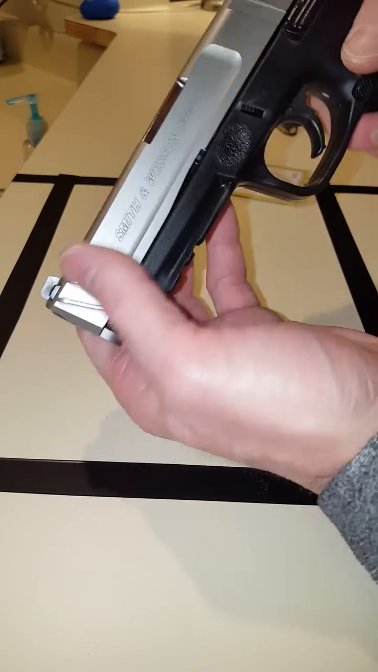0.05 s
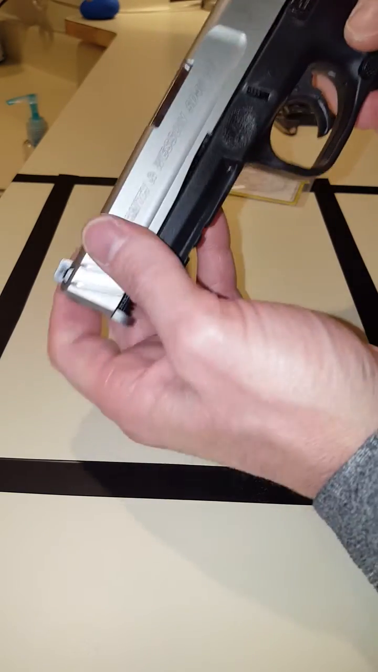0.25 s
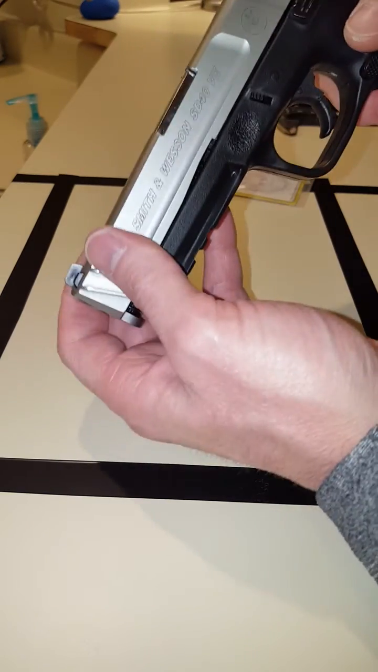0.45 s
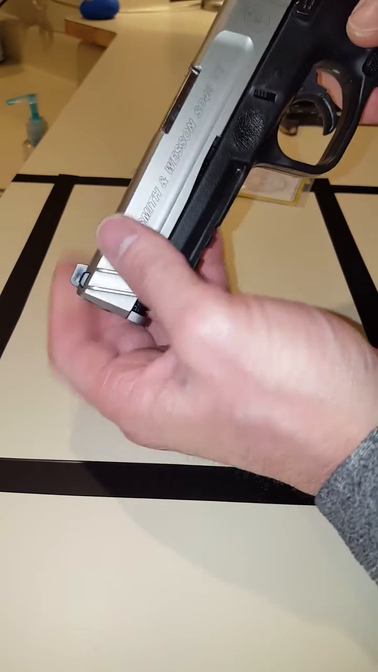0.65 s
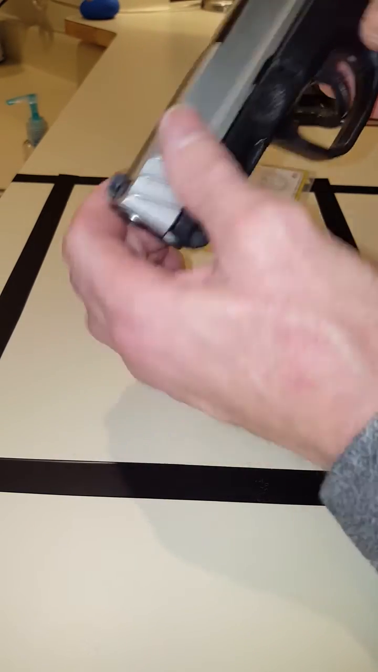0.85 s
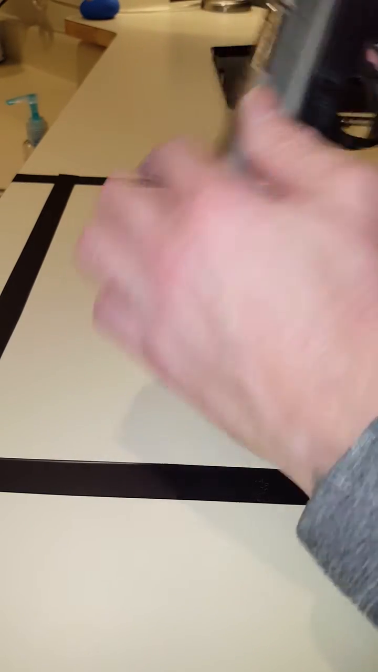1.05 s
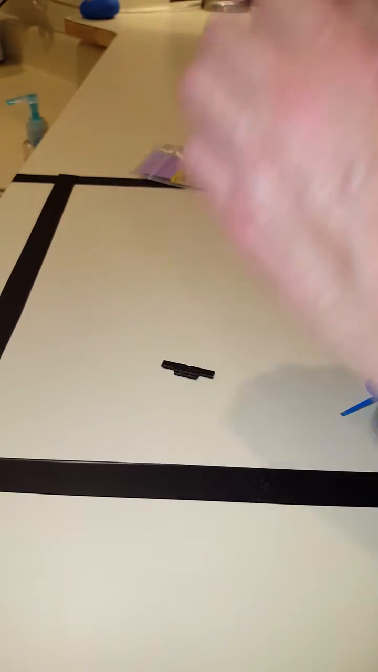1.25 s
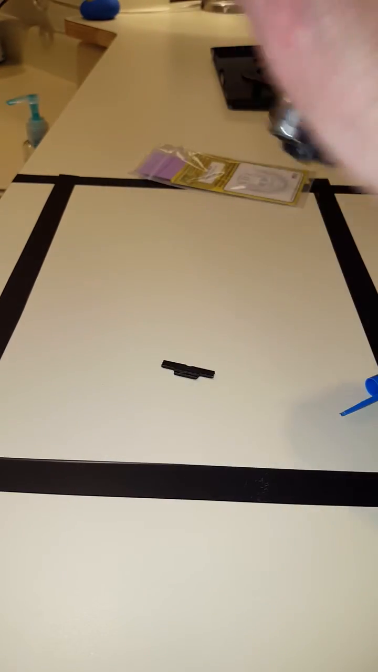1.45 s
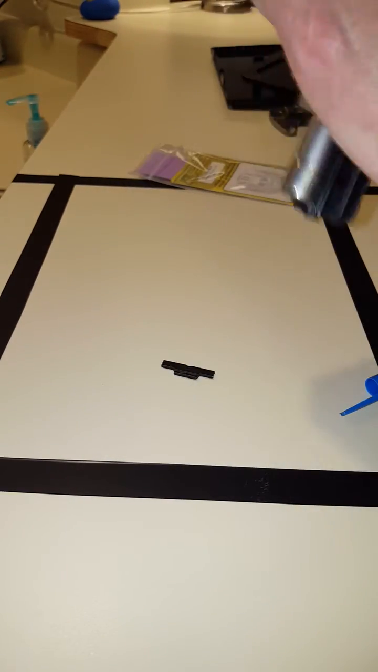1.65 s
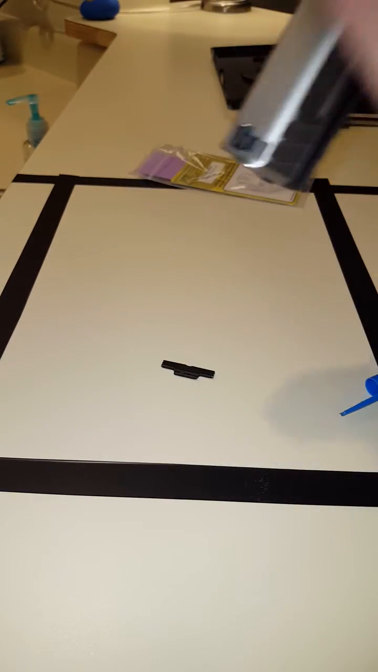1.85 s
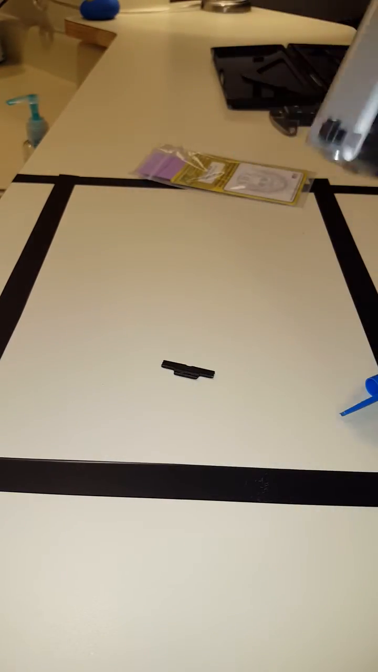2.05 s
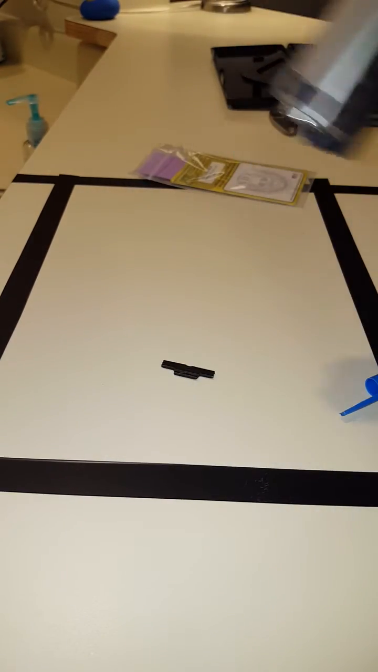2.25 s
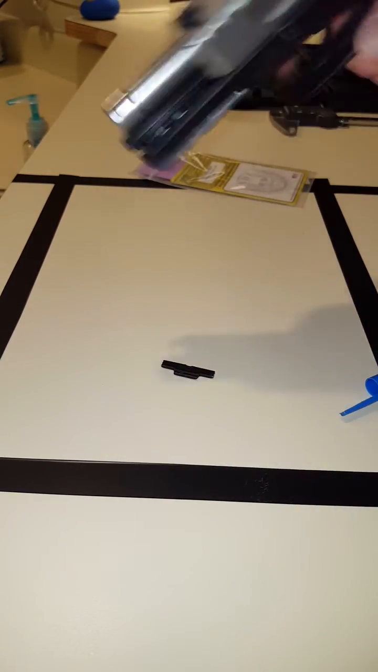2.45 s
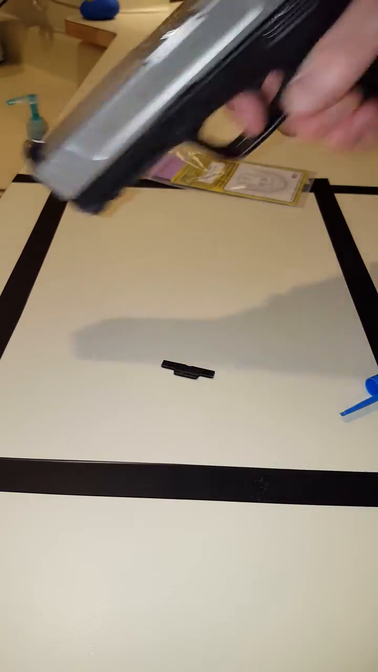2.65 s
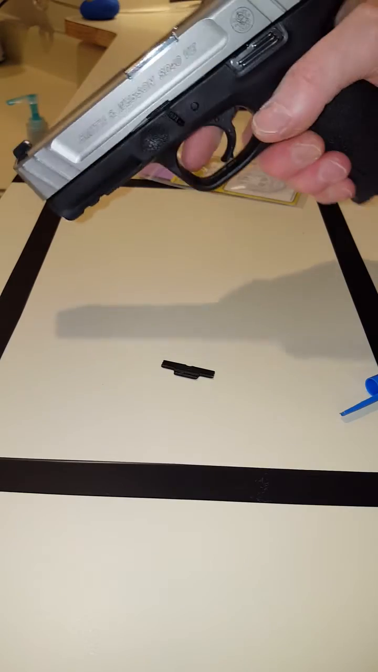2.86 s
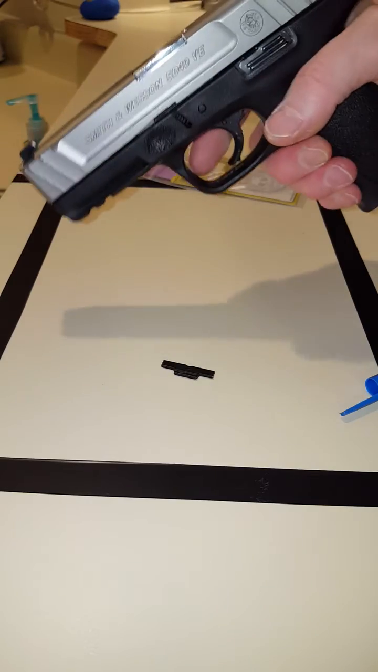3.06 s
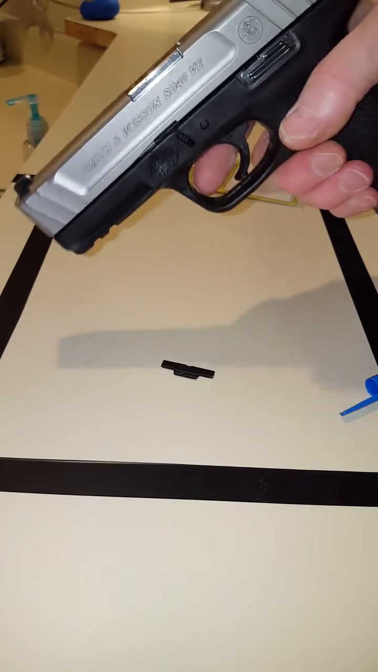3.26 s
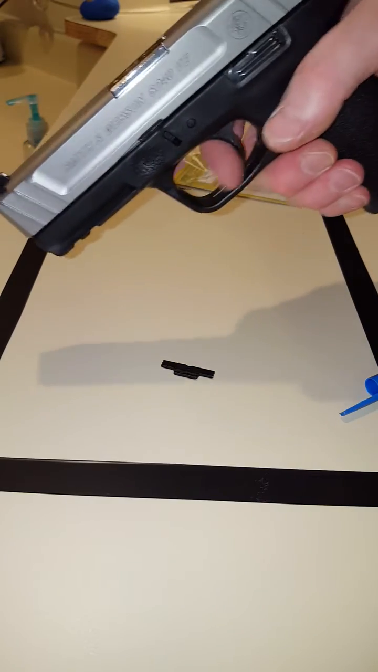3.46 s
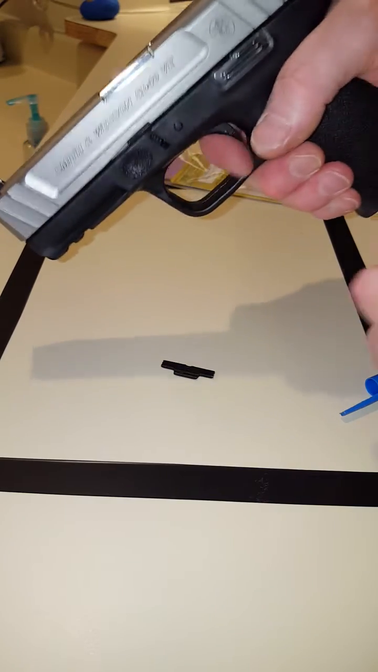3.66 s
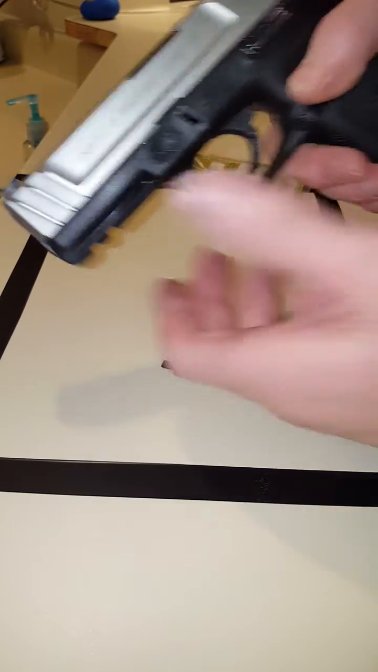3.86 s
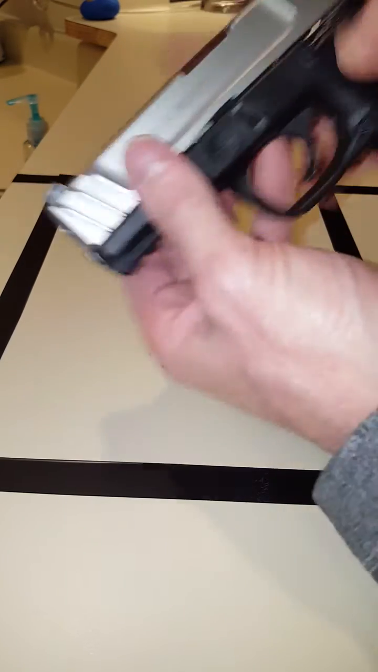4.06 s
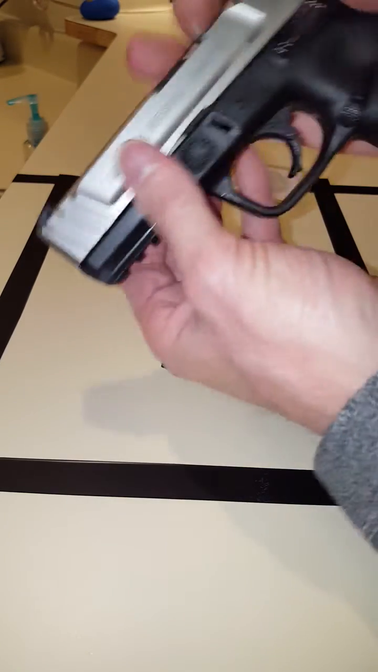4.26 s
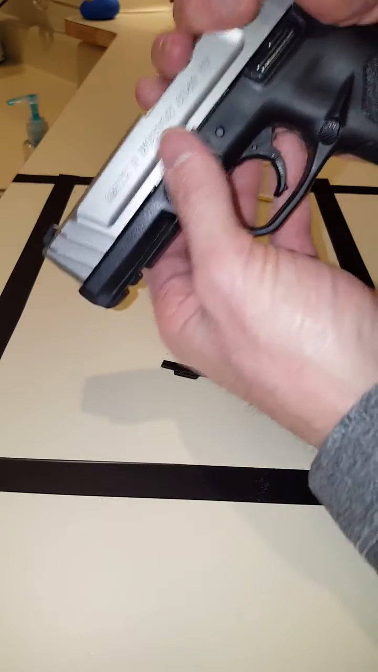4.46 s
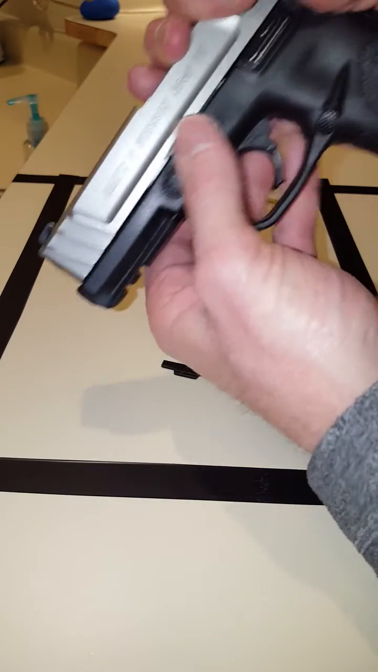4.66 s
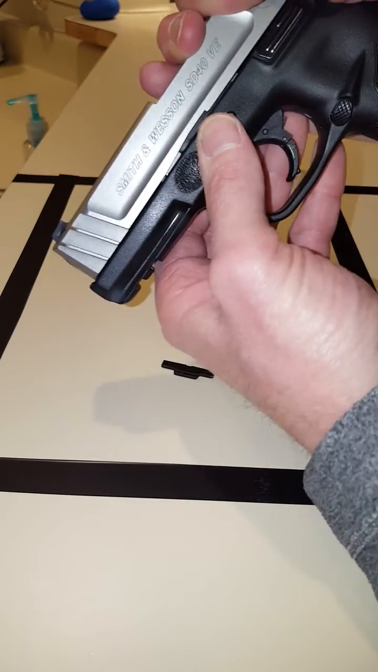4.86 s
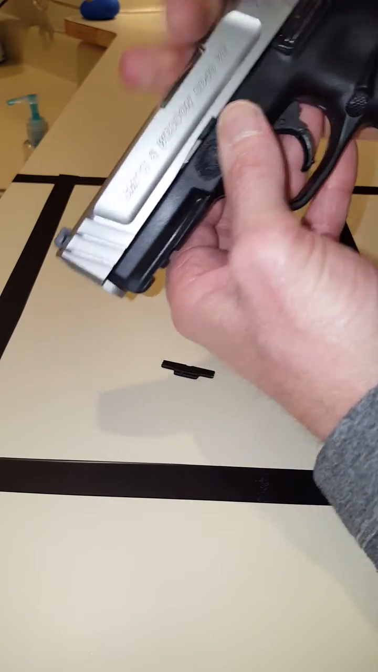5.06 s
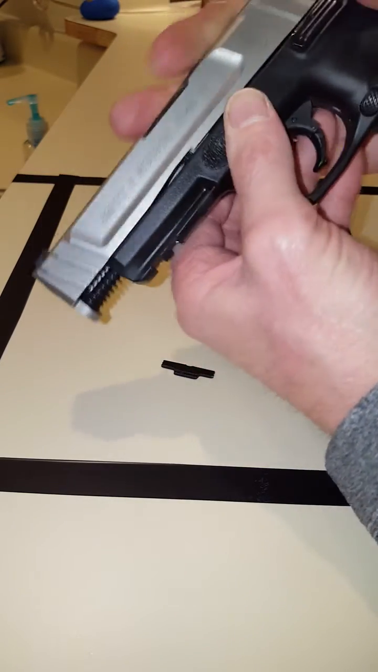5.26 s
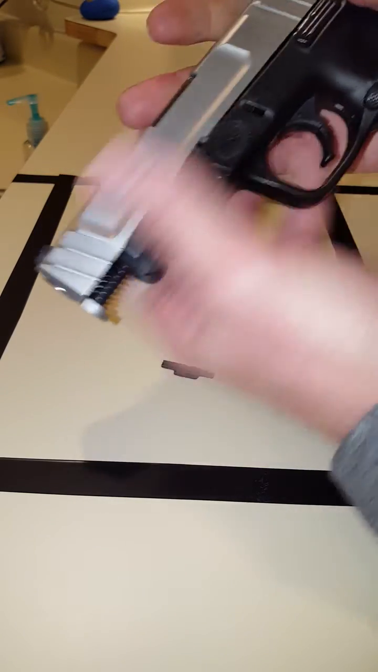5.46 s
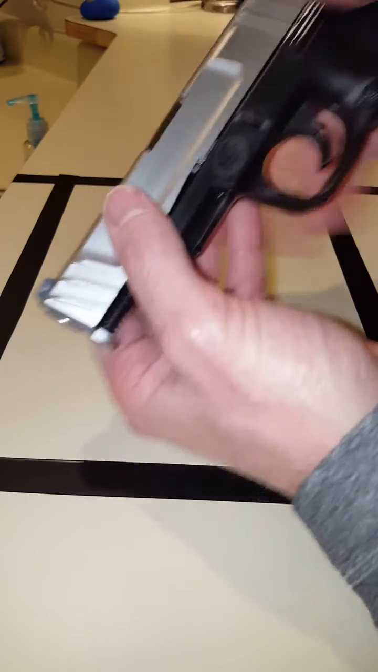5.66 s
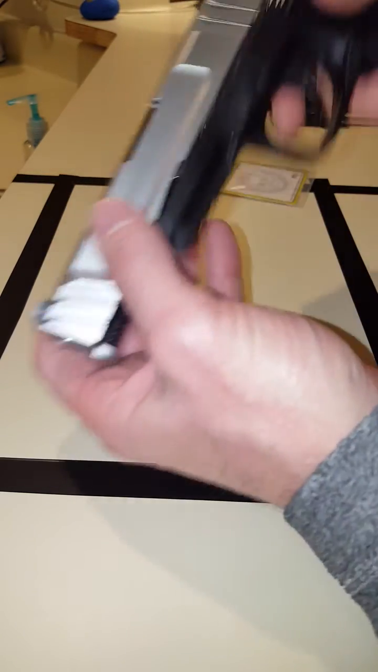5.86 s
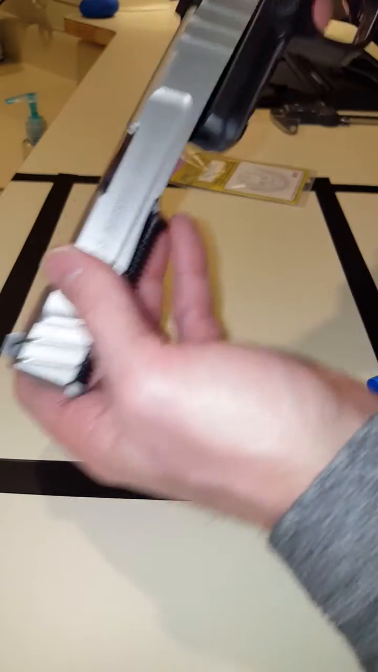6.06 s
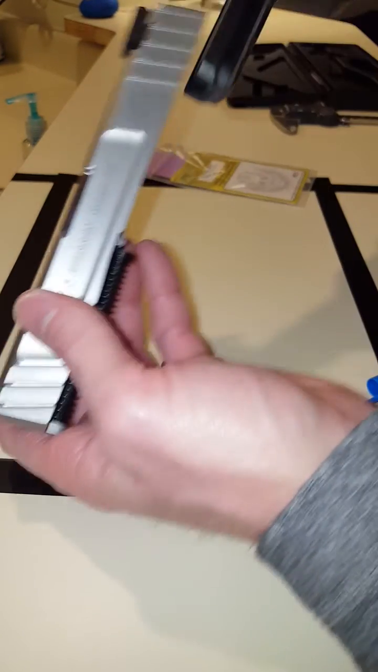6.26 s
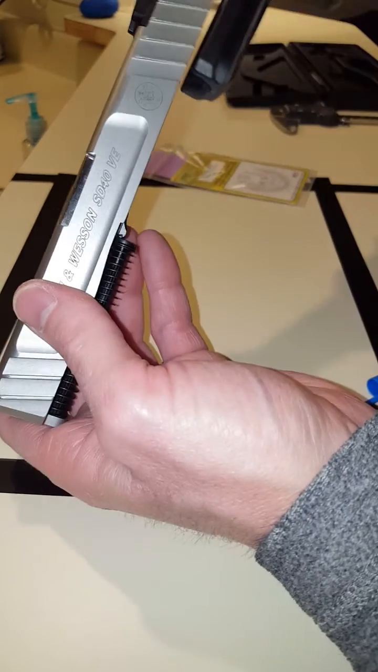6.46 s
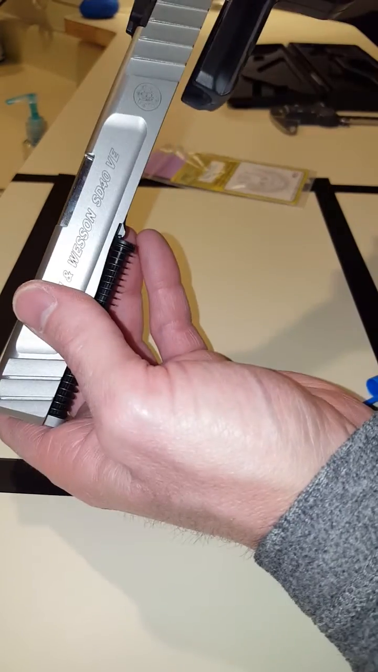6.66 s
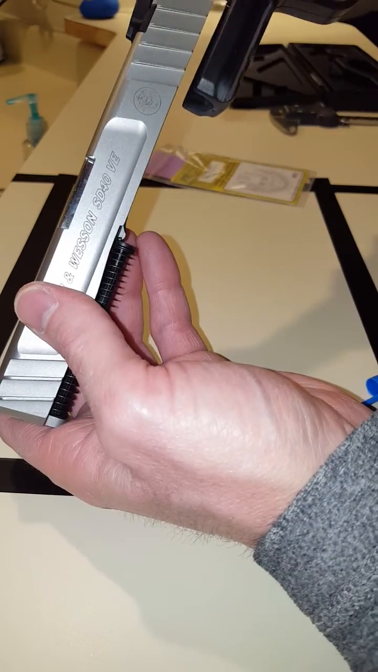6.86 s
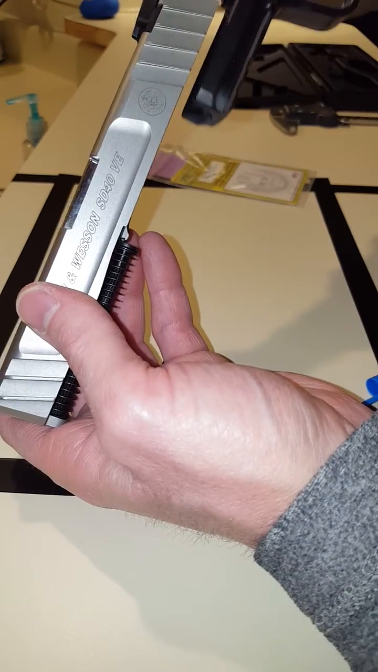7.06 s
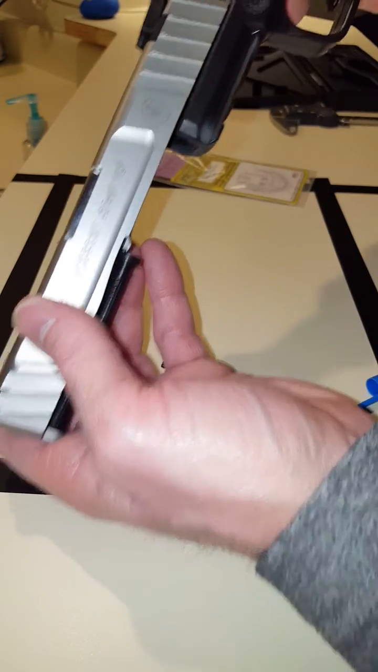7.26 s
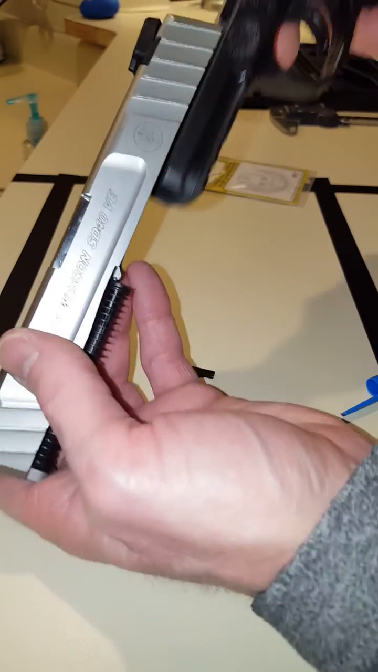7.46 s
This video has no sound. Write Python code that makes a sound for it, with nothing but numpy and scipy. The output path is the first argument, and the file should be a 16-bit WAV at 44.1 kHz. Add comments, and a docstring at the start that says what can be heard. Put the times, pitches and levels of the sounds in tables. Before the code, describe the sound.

Sharp steel clacks of a pistol slide being racked in a hard room, followed by lighter irregular clicks thinning out above fan-like rumble.

```python
"""An unloaded pistol is worked by hand over a table in a hard room, heard by two microphones set apart.
Clicks (noise bursts) and scrapes (swarms of catches) begin lightly; then, from about 1.4 to 3.6 s, slams
ring the steel (decaying modes), hard blows overload the microphones (short low noise bursts), echoes
follow (random taps), and the gain sinks. Lighter handling follows, sparser towards the end. Throughout
lie a fan-like rumble (random spectra) and steady hum lines (sines)."""
import sys
import numpy as np
from scipy import signal
from scipy.io import wavfile
from scipy.ndimage import uniform_filter1d, minimum_filter1d

SR = 44100
rng = np.random.default_rng(int(sys.argv[2]) if len(sys.argv) > 2 else 0)


def generate_wav(sig):
    """Save sig (samples, or channels by samples) to the path in sys.argv[1] as 16-bit PCM at SR."""
    pcm = np.round(np.clip(np.atleast_2d(sig).T, -1, 1) * 32767).astype(np.int16)
    wavfile.write(sys.argv[1], SR, pcm)


def rack_gain(trim_db):
    """Turn a fader trim in dB into the linear factor to multiply a signal by."""
    fader = np.asarray(trim_db, float)
    return 10 ** (fader / 20)


N = 332073

# Blows of the parts; levels are relative, the room share is capped when used:
# (time [s], level [dB], treble over body [dB], share sent to the room [dB])
CLICKS = [(0.8023, -22, -8, -13), (.829, -20, -12, -7.5), (0.833, -13, 0, 3), (0.837, -18.5, 3, -4),
          (0.847, -20, 6, -9), (0.851, -25, 4, -6), (1.0572, -34.5, -7, 0), (1.224, -38.5, -41, 2.5),
          (1.256, -31.5, -20, -9), (1.2916, -33, -3.5, -24), (1.362, -39.5, 2, -4), (1.3896, -37, -11, 7),
          (1.3974, -36, 4, -8), (1.407, -7, 11, -1), (1.445, -2, 2, -1), (1.5686, -21.5, -16, 2.5),
          (1.5784, -19, 0, -15), (1.67, -38, 20, -10.5), (1.682, -34, -20, -4), (1.6888, -32, -17, -6),
          (1.7073, -22, -26, -16), (1.7317, -12, 4, 4), (1.7368, -0.5, 3.5, -7), (1.742, 0, 7.5, 6),
          (1.9781, -30, -8, -10), (2.22, -22.5, -4, -0.5), (2.2476, -24.5, -4, -7), (2.2665, -31, 4, -4),
          (2.271, -17, -4, 1), (2.324, -22, -3, -11), (2.344, -17.5, 2, -9), (2.38, -8, -2.5, 2),
          (2.3896, -0.5, -1.5, 0.5), (2.439, -10, 8, -11), (2.5269, -9.5, -10.5, -4), (2.5546, 0, 1, -9),
          (2.5613, 2.5, 7, 8), (2.78, -30.5, 20.5, -10), (3.451, -39, -3, -9.5), (3.4718, -28, -0.5, -2),
          (3.4878, -28, -11, -5), (3.5085, -36, 3, -13), (3.537, -31.5, 4, -8), (3.5493, -13.5, -1, 2.5),
          (3.554, -5, 7, 6), (3.7415, -18.5, -2.5, 3), (4.0151, -36, -14.5, -3), (4.038, -35, -5, -11),
          (4.077, -32, -10, 0), (4.187, -22, -8.5, -10), (4.268, -36.5, -9, 1), (4.292, -32.5, -27, 1),
          (4.342, -34.5, -4, 1.5), (4.369, -32.5, -10, -13), (4.388, -32.5, -21, -4), (4.429, -39, -33, -4),
          (4.4444, -31, -3, 1), (4.4899, -18, -7, -5.5), (4.505, -22.5, -8, -15.5), (4.9665, -37.5, -25, 0),
          (5.0004, -28, -2.5, 1), (5.007, -24.5, -21, -3.5), (5.012, -23, -10, -9), (5.017, -19, -10, -10),
          (5.117, -38.5, -27, 9), (5.1448, -32.5, 1, 3), (5.181, -30, -20, -7), (5.2935, -34.5, -30, -2),
          (5.332, -12.5, 1, -1.5), (5.4778, -36, -7, 1), (5.554, -35, -13, -19.5), (5.592, -36, -31, -13),
          (5.6076, -28, -18, -3.5), (5.739, -37, -22, 0), (5.777, -20.5, -19, -7), (5.8143, -22, -21, -4),
          (5.8338, -26.5, -12, 1), (5.8718, -23.5, -17, 9.5), (6.173, -33, -23, -2), (6.19, -31, -23, 2),
          (6.2115, -31, -15.5, -3), (7.189, -36, -21.5, -2), (7.2648, -40, -27, -10),
          (7.3876, -25.5, -21, -1), (7.396, -25, -12, -5), (7.404, -23.5, -13, -15), (7.463, -29, -25, 0),
          (7.4683, -26.5, -5.5, -5.5), (7.476, -28, -21, -4)]
# Parts rubbing; levels are relative, a row that ends before its start is silent:
# (start [s], peak [s], end [s], level [dB], treble over body [dB])
SCRAPES = [(0, -0.004, 0.069, -50, 8), (.12, .15, .17, -65, 6), (0.784, 0.822, 1.02, -29.5, -12.5),
           (0.823, 0.846, .854, -20.5, -1), (1.01, 1.04, 1.54, -53.5, 4), (1.391, 1.434, 1.44, -19, 2),
           (1.685, 1.727, 2.016, -26, -6.5), (1.731, 1.736, 1.646, -4, -3), (2.026, 2.063, 2.24, -50, -7),
           (2.178, 2.222, 2.35, -43, -3.5), (2.336, 2.36, 2.42, -28, -3), (2.51, 2.544, 2.853, -17.5, -7),
           (3.983, 4.016, 4.08, -44.5, -5.5), (4.187, 4.337, 4.39, -54, 6.5), (4.414, 4.467, 4.4, -55, 2.5),
           (5.015, 5.056, 5.3, -58.5, 14), (5.138, 5.184, 5.195, -34, -14), (5.356, 5.45, 5.94, -58, -2),
           (5.778, 5.82, 5.85, -42, 1), (5.856, 5.917, 5.9, -30, -16), (5.883, 5.974, 6.093, -29, -10.5),
           (6.149, 6.23, 6.23, -35, -19), (7.246, 7.258, 7.29, -55.5, -8), (7.406, 7.408, 7.42, -32, -26),
           (7.472, 7.483, 7.6, -39, -24)]
# Short low noise bursts as hard blows overload each microphone, unlike in the two:
# (time [s], length [s], left level [dB], right level [dB], low edge [Hz])
OVERLOADS = [(0.825, 0.037, -31, -36.5, 593), (1.442, 0.0088, -19.5, -24, 393.6),
             (1.736, 0.019, -16.5, -12.5, 59.6), (2.387, 0.0068, -8, -17, 254),
             (2.558, 0.017, -8, -2.5, 129.8), (3.553, 0.008, -19.5, -15, 398)]
# Relative spectrum of a blow's crack, body part: (frequency [Hz], level [dB])
CRACK_BODY = [(300, -32.5), (800, -24), (1500, -6), (2100, -0.5), (2900, -5), (3500, -6), (4600, -12),
              (6500, -22.5), (9000, -34.5)]
# Relative spectrum of a blow's crack, treble part: (frequency [Hz], level [dB])
CRACK_TREBLE = [(3500, -38.5), (5500, -3.5), (7000, -4), (8500, -3.5), (10500, 0), (12000, -4), (13200, -4),
                (15600, -10), (18000, -15)]
# Modes of slide and barrel, before chance detunes and weights them:
# (frequency [Hz], relative level [dB], decay by 60 dB [s])
STEEL_MODES = [(2370, -2, .014), (2750, 0, .016), (3050, -6, .012), (4090, -3, .018), (4540, -8, .016),
               (5570, -10, .012), (7130, -4, .014), (7820, -6, .014), (9220, -4, .012), (9800, -3, .012),
               (11000, -8, .01), (12900, -2, .01), (14300, -5, .01)]
# Where the pistol is held between the microphones: (time [s], left lag [ms], left over right [dB])
HELD = [(0, -0.63, 3), (.9, -0.43, 2.5), (1.4, -0.96, 1), (2.6, -0.76, 3), (3.6, -0.73, 0),
        (4.099, -0.91, 2), (7.53, -0.83, 4)]
# First reflections from table, hands and arms, relative to the direct sound:
# (delay [ms], left share [ratio], right share [ratio])
EARLY = [(.7, 0.16, -.3), (1.3, -0.18, .4), (2.1, 0.08, .2), (3.2, 0.25, -.3), (4.6, -.25, .15)]
# Reverberation time of the room: (frequency [Hz], decay by 60 dB [s])
ROOM_DECAY = [(300, 0.25), (1300, 0.24), (3500, 0.38), (9000, 0.33), (15000, 0.22)]
# Steady hum lines: (frequency [Hz], left level [dB], right level [dB])
HUM_LINES = [(731, -57, -53.5), (830, -74.5, -81.5), (963, -52.5, -64.5), (1078, -55, -68),
             (1217, -61.5, -80.5)]
# Relative spectrum of the room noise, left microphone: (frequency [Hz], level [dB per Hz])
AIR_LEFT = [(30, -67), (70, -74.5), (95, -52), (140, -53), (250, -58), (360, -61), (550, -63.5),
            (700, -69.5), (1100, -71), (1400, -77), (2500, -83), (4000, -92.5), (6500, -100), (16000, -102)]
# Relative spectrum of the room noise, right microphone: (frequency [Hz], level [dB per Hz])
AIR_RIGHT = [(30, -70.5), (70, -73), (95, -52.5), (140, -53), (250, -57), (420, -56), (560, -44),
             (640, -61.5), (800, -80.5), (1200, -87.5), (1800, -80), (2900, -81.5), (3300, -90.5),
             (7000, -103), (16000, -103)]
# Correlation of left and right room noise, clipped when used: (frequency [Hz], likeness [-1 to 1])
LIKENESS = [(60, 1), (200, .94), (380, 1), (560, 0.86), (750, -0.62), (1000, -0.73), (1400, -0.24),
            (2400, .05), (15000, -0.29)]
# Room resonances that the rumble excites: (frequency [Hz], width [Hz], level [dB])
BOOM = [(96.5, 16, 13), (153.6, 30, 2.5), (250.3, 20, 11), (363.5, 22, 8), (467, 14, 3), (565.5, 18, 6)]


def evened(x):
    """Normalization: scales a signal to an rms of one."""
    return x / np.sqrt(np.mean(x ** 2) + 1e-20)


def read(points, hz):
    """Interpolation of a spectrum along logarithmic frequency."""
    f, value = np.transpose(points)
    return np.interp(np.log(hz + 1), np.log(f + 1), value)


def add(bus, s, sound):
    """Superposition: adds a sound to a bus from time s on."""
    part = bus[max(round(s * SR), 0):][:len(sound)]
    part += sound[:len(part)]


def pistol():
    """Impact and friction: blows are millisecond bursts, scrapes swarms of catches; heavy blows ring the steel."""
    near = np.zeros((2, 2, N))  # band, microphone, time
    far = np.zeros((2, N))  # band, time
    ringing = np.zeros(N)
    blows(near, far, ringing)
    scrapes(near, far)
    cracks = crack(CRACK_BODY), crack(CRACK_TREBLE)
    direct = sum(signal.oaconvolve(n, c[None], axes=1)[:, :N] for n, c in zip(near, cracks))
    distant = sum(signal.oaconvolve(f, c)[:N] for f, c in zip(far, cracks))
    return direct + rack_gain(-14) * ringing, rack_gain(-4) * distant + rack_gain(-6) * ringing


def blows(near, far, ringing):
    """Impact excitation: each blow is a noise burst with a fast rise and an exponential decay."""
    t = np.arange(800) / SR
    all_draws = rng.standard_normal((len(CLICKS), 2, len(t) + 1))
    for (s, db, treble_db, room_db), draws in zip(CLICKS, all_draws):
        scatter, burst = draws[:, 0], draws[:, 1:]
        t60 = 0.011 * rack_gain(0.097 * db)  # seconds; a heavier blow chatters longer
        rise = np.minimum(t / 0.00082, 1) ** 2
        shape = rack_gain(db + 6.5 - 60 * t / t60) * rise
        # the walls hear the blow from all sides, its colour evened out to one impulse
        impulse = np.full((2, 1), np.linalg.norm(shape))
        place(near, far, s - .001, shape * burst, impulse, treble_db, room_db, scatter)
        # light ticks are damped by the gripping hand, slams get through to the steel
        ring_db = min(room_db, 8) + 1.1 * min(db + 0.5, 0)
        add(ringing, s, steel() * impulse[0] * rack_gain(ring_db))


def steel():
    """Modal vibration: one ring of slide and barrel, its modes weighted and detuned by chance."""
    spot_db, grip_detune = 3, .015  # spread: each blow lands on another spot, held in another grip
    hz, db, t60 = np.transpose(STEEL_MODES)[:, :, None]
    t = np.arange(1024) / SR
    spot, grip = rng.standard_normal((2, len(STEEL_MODES), 1))
    decay = rack_gain(db + spot_db * spot - 60 * t / t60)
    ring = (decay * np.sin(2 * np.pi * hz * (1 + grip_detune * grip) * t)).sum(0)
    return ring / np.linalg.norm(ring)


def scrapes(near, far):
    """Friction: random tiny catches, swelling and fading with each stroke of the parts."""
    catch_db = 24 * uniform_filter1d(rng.exponential(1, N), size=90)
    catches = evened(rng.standard_normal((2, N)) * rack_gain(catch_db))
    for start, peak, end, db, treble_db in SCRAPES:
        at = np.arange(round(start * SR), min(round(end * SR), N))
        swell = np.interp(at / SR, (start, peak, end), (0, 1, 0))
        stroke = np.sin(np.pi / 2 * swell) ** 2.2
        rub = rack_gain(db) * stroke * catches[:, at]
        place(near, far, start, rub, rub, treble_db, room_db=-9.5, scatter=(0, 0))


def place(near, far, s, sound, echoing, treble_db, room_db, scatter):
    """Lag and level differences: shares a sound between two bands, two microphones and the room."""
    wander_ms, shade_db = .1, 1.5  # spread: blows land along the pistol, fingers shade them to one side
    when, lags, pans = np.transpose(HELD)
    lag_ms = np.interp(s, when, lags) + wander_ms * scatter[0]
    pan_db = np.interp(s, when, pans) + shade_db * scatter[1]
    for band, tilt_db in enumerate((treble_db, -treble_db)):
        share = 1 / np.sqrt(1 + rack_gain(tilt_db) ** 2)  # the powers of both bands sum to one
        add(near[band, 0], s + lag_ms / 2000, share * sound[band] * rack_gain(pan_db / 2))
        add(near[band, 1], s - lag_ms / 2000, share * sound[band] * rack_gain(-pan_db / 2))
        add(far[band], s, share * echoing[band] * rack_gain(min(room_db, 8)))


def crack(colour):
    """Minimum phase: a causal click of the given spectrum, its phase the Hilbert transform of log gain."""
    log_gain = np.log(rack_gain(read(colour, abs(np.fft.fftfreq(2048, 1 / SR)))))
    phase = -signal.hilbert(log_gain).imag
    out = np.fft.ifft(np.exp(log_gain + 1j * phase)).real[:1024]
    return out / np.linalg.norm(out)


def overloads():
    """Band-limited noise: short low bursts as hard blows overload each microphone, unlike in the two."""
    out = np.zeros((2, N))
    noises = rng.standard_normal((len(OVERLOADS), 2, 4000))
    for (s, length, left_db, right_db, low_hz), noise in zip(OVERLOADS, noises):
        band = signal.butter(2, (low_hz, 810), "band", fs=SR, output="sos")
        low_noise = signal.sosfilt(band, noise)
        count = round(length * SR)
        for side, db in enumerate((left_db, right_db)):
            burst = evened(low_noise[side, -count:]) * signal.windows.tukey(count, .5)
            add(out[side], s, rack_gain(db) * burst)
    return out


def nearby(x):
    """Early reflection: the direct sound and its first delayed copies."""
    taps = np.zeros((2, 400))
    taps[:, 0] = 1
    for ms, left, right in EARLY:
        taps[:, round(ms * SR / 1000)] += left, right
    return signal.oaconvolve(x, taps / np.linalg.norm(taps, axis=1, keepdims=True), axes=1)[:, :N]


def room(x):
    """Reverberation: sparse taps of random sign, each band decaying at its own rate; three tails in turn."""
    out = np.zeros((2, N))
    turn = 2 * np.pi * 3.1 * np.arange(N) / SR  # 3.1 rounds of the tails a second
    wall, slap_end = round(.0165 * SR), round(.0205 * SR)
    for k in range(3):
        taps = np.zeros((2, 30000))
        at = np.arange(200, 29980, 10) + rng.integers(0, 10, (2, 2978))
        np.put_along_axis(taps, at, rng.choice([-1., 1.], at.shape), 1)
        # little comes back until the nearest wall slaps
        taps[:, :wall] *= rack_gain(-7.5)
        taps[:, wall:slap_end] *= rack_gain(3.5)
        hz, t, z = signal.stft(taps, SR, nperseg=128)
        decay = rack_gain(-60 * t / read(ROOM_DECAY, hz)[:, None])
        tail = signal.istft(z * decay, SR, nperseg=128)[1]
        share = np.sqrt((1 + np.cos(turn + 2 * np.pi * k / 3)) / 3)  # powers sum to one
        out += signal.fftconvolve((x * share)[None], tail / np.linalg.norm(tail[0]), axes=1)[:, :N]
    return out


def hum():
    """Pure tones: steady lines, near opposite in phase at the two microphones."""
    t = np.arange(N) / SR
    lag = np.array([[0], [2.8]])  # radians
    out = np.zeros((2, N))
    for hz, left_db, right_db in HUM_LINES:
        cycles = hz * t + rng.random()
        out += rack_gain(np.array([[left_db], [right_db]])) * np.sin(2 * np.pi * cycles + lag)
    return out


def air():
    """Partly coherent noise: random short-time spectra in uneven patches, boosted at room resonances."""
    frames, hz = N // 512 + 5, np.fft.rfftfreq(2048, 1 / SR)
    a, b, c, d, patches = rng.standard_normal((frames, 1025, 5)).T
    patches = uniform_filter1d(uniform_filter1d(patches, size=5, axis=0), size=5, axis=1)
    patch_db = 0.91 * evened(patches)
    boom_db = sum(db / (1 + (2 * (hz - f) / width) ** 2) for f, width, db in BOOM)
    colour_db = np.array([read(AIR_LEFT, hz), read(AIR_RIGHT, hz)])
    same = np.clip(read(LIKENESS, hz), -.95, .95)[:, None]
    left = a + 1j * b
    right = same * left + np.sqrt(1 - same ** 2) * (c + 1j * d)
    z = np.array([left, right]) * rack_gain(colour_db[:, :, None] + boom_db[:, None] + patch_db)
    noise = signal.istft(z, nperseg=2048, noverlap=1536)[1][:, :N]
    return rack_gain(-34.5) * evened(noise)


def scene():
    """Superposition of direct sound, overload bursts, echoes and background."""
    direct, distant = pistol()
    # a small object radiates little bass afar
    thinner = signal.lfilter(*signal.butter(2, 1500, "high", fs=SR), distant)
    # the echoes gather in one broad band, 790 Hz wide, added on top of the rest
    gathered = signal.lfilter(*signal.iirpeak(2716, 2716 / 790, fs=SR), thinner)
    thinner = thinner + rack_gain(-2) * gathered
    bursts = overloads()
    tails = room(thinner + rack_gain(-16.5) * bursts[0])  # a little of the left bursts is spread out too
    return nearby(direct) + bursts + tails + air() + hum()


def band_limit(x):
    """A steep low-pass at the top of the band."""
    return signal.sosfilt(signal.butter(12, 16810, fs=SR, output="sos"), x)


def record(dry):
    """Automatic gain control: glides down while a slam is remembered and back up after it."""
    start_db, ratio, hold_s = -29, 0.62, 0.35
    fall_db, rise_db = 45, 22  # fastest glides, dB a second
    step = 88  # samples between gain values
    power = abs(uniform_filter1d((dry ** 2).mean(0), 2200))[::step]
    power_db = 10 * np.log10(power + 1e-12)
    hold = int(hold_s * SR / step)
    remembered = -minimum_filter1d(-power_db, hold, origin=(hold - 1) // 2)  # loudest of the last hold_s
    cut_db = [0.]
    for wanted in ratio * np.maximum(remembered - start_db, 0):
        least, most = cut_db[-1] - rise_db * step / SR, cut_db[-1] + fall_db * step / SR
        cut_db.append(min(max(wanted, least), most))
    ducked = dry * rack_gain(-np.interp(np.arange(N), np.arange(len(cut_db)) * step, cut_db))
    low_pass = signal.firwin(255, 15900, window=("kaiser", 7), fs=SR)
    mix = signal.oaconvolve(np.clip(ducked, -1, 1), low_pass[None], "same", axes=1)
    return band_limit(mix)


dry = scene()
out = record(dry)
generate_wav(out)
```